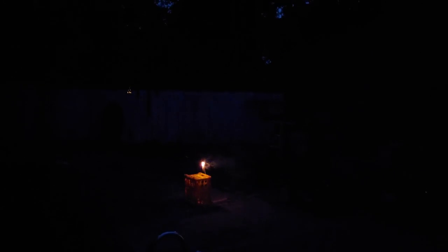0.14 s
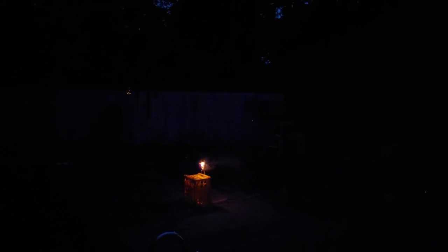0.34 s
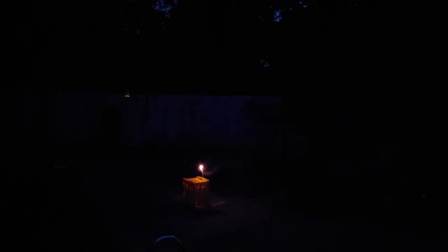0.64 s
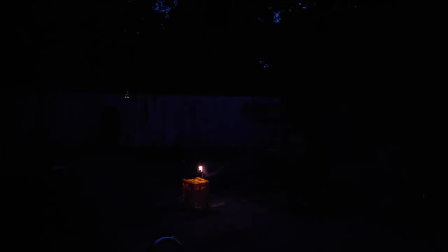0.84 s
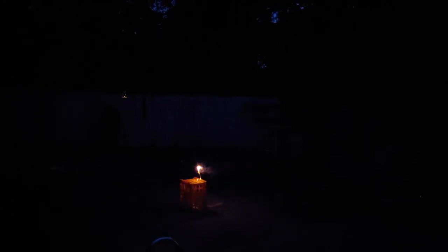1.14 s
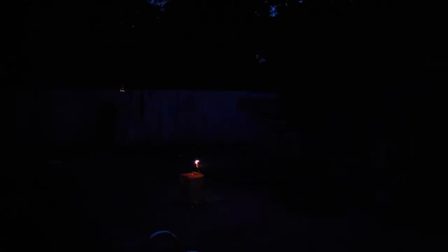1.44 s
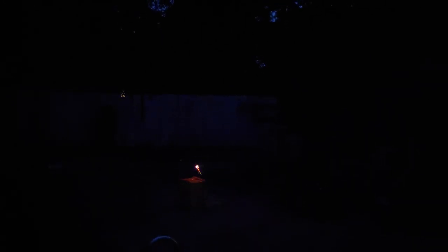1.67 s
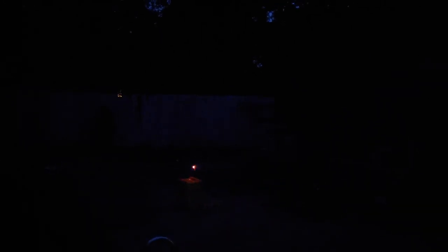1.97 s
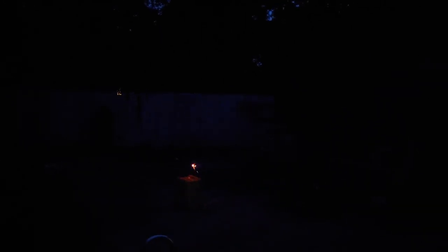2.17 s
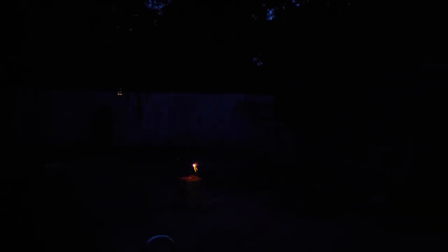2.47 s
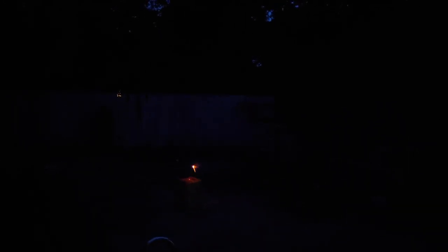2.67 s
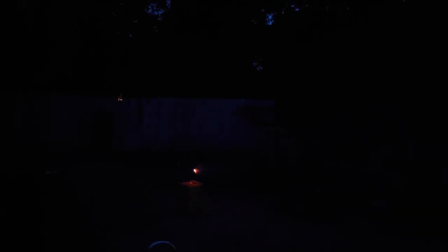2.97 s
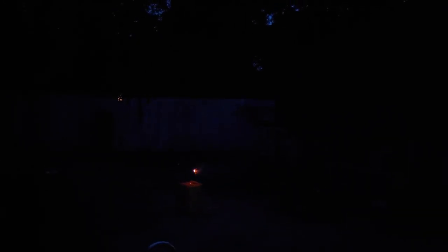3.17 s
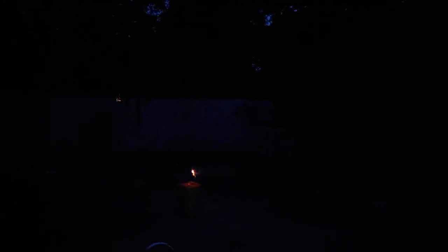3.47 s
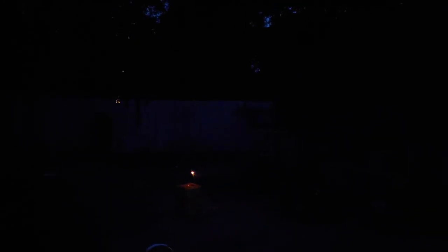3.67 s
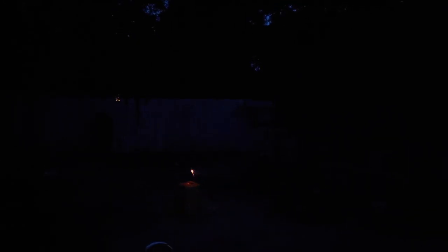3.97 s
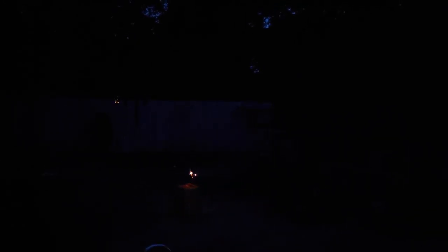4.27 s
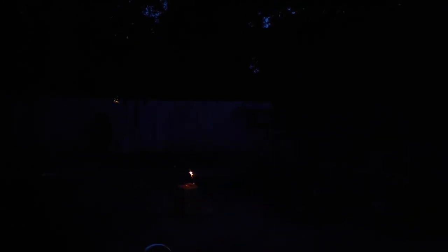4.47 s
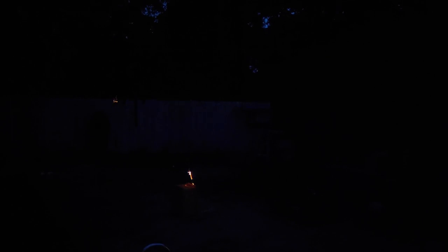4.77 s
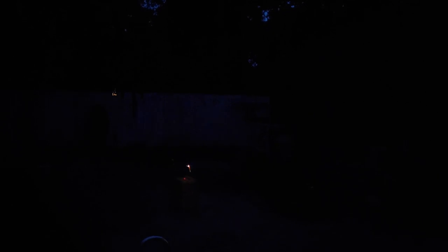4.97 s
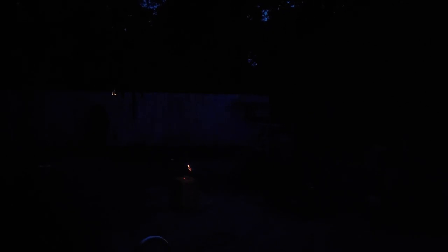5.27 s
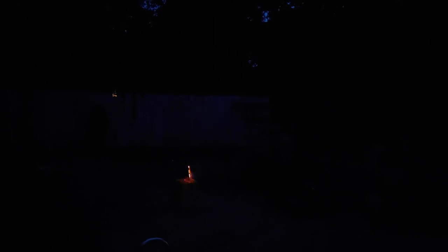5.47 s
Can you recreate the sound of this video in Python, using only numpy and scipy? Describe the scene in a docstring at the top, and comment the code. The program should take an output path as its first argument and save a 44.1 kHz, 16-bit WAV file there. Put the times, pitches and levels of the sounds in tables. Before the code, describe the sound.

Outdoors at night, a few metres from a stereo microphone pair, a homemade rocket motor burns with a dull, fluttering low roar full of tiny pops. Low thumps of gas and rough spark puffs punctuate it irregularly. Past the middle a broad whoosh flares and sinks, the burning stays stronger, and a thin hiss rises at the end.

```python
"""A homemade rocket motor burns at its fuse end in a yard at night, a few metres from a stereo microphone pair.
The flame is coloured noise: a dull, fluttering roar with small pops. A thin hiss of powder carries airy whistles.
Spurts of sparks are puffs of rough noise that rush out and die away; gas pockets are short low pulsations.
One big flare, a broad whoosh with a brief bright jet, comes past the middle; near the end the hiss swells."""
import sys
import numpy as np
from scipy import signal
from scipy.fft import rfft, irfft, next_fast_len
from scipy.io import wavfile

SR = 44100
rng = np.random.default_rng(int(sys.argv[2]) if len(sys.argv) > 2 else 0)


def transcribe(u):
    """Save the signal u as a 16-bit wav file named by the first command-line argument.

    u: samples, shape (n,) or (channels, n), limited to [-1, 1]; the rate is SR.
    q: integer samples, one column per channel.
    """
    v = np.clip(np.atleast_2d(u).T, -1, 1)
    q = np.round(v * 32767).astype(np.int16)
    wavfile.write(sys.argv[1], SR, q)


N = 247842
TIME = np.arange(N) / SR   # s
# In every *_COLOUR table the decibels give only the shape: the noise is later scaled to unit rms.


def from_db(db):
    """Decibels to amplitude gain."""
    return 10 ** (np.asarray(db) / 20)


def rms_one(x):
    """Scale to unit rms."""
    return x / np.sqrt(np.mean(x ** 2) + 1e-20)


def level_over_time(points):
    """Join (time, level) points by straight lines, read at every sample."""
    seconds, level = np.transpose(points)
    return np.interp(TIME, seconds, level)


def at_hz(points, hz):
    """Read a (frequency, value) table on a log-frequency axis."""
    where, value = np.transpose(points)
    return np.interp(np.log(hz), np.log(where), value)


def drift(rate_hz):
    """Slow random wander of unit rms: noise through two equal low-pass poles, made at SR / 40."""
    step = 40   # samples
    pole = np.exp(-2 * np.pi * rate_hz * step / SR)
    settling = 2000   # filter start-up, thrown away
    noise = rng.standard_normal(N // step + settling + 2)
    slow = signal.lfilter([1], [1, -2 * pole, pole * pole], noise)[settling:]
    return np.interp(np.arange(N) / step, np.arange(len(slow)), rms_one(slow))


PORT_LAG_S = 0.00024   # the left microphone is nearer, so the right one hears the motor later


def at_microphones(x):
    """A sound straight from the motor reaches the right microphone a little later."""
    return np.array([x, np.interp(TIME - PORT_LAG_S, TIME, x)])


# power arriving straight from the motor, the rest being scattered by the yard: hz, direct_share (0-1)
DIRECT_SHARE = [(60, 0.91), (130, 1), (290, 0.82), (640, 0.73), (1200, 0.4), (2000, .05), (4000, 0.2),
                (14000, 0.1)]
# which microphone hears more: hz, left_minus_right_db
LEFT_LEAN = [(60, 2), (110, 1), (200, -1), (380, 2), (700, 0.5), (1290, -2), (2380, -1), (4400, -3.0),
             (8120, 3), (15000, 2.5)]


def turbulence(colour):
    """Stereo noise of one colour: a direct part with the lag, and a scattered part unlike at each microphone."""
    size = next_fast_len(N)
    hz = np.maximum(np.fft.rfftfreq(size, 1 / SR), 1)
    white = rfft(rng.standard_normal((3, size)))
    share = np.clip(at_hz(DIRECT_SHARE, hz), 0, 1)
    lag_s = np.array([[0], [PORT_LAG_S]])
    direct = white[0] * np.exp(-2j * np.pi * hz * lag_s)
    scattered = white[1:]
    both = np.sqrt(share) * direct + np.sqrt(1 - share) * scattered
    lean_db = at_hz(LEFT_LEAN, hz) * [[0.5], [-0.5]]
    gain = from_db(at_hz(colour, hz) + lean_db)
    return rms_one(irfft(both * gain, size)[:, :N])


def burst(start_s, rise_s, t60_s):
    """Envelope of a release of gas: a quick rise, then an exponential fall of 60 dB in t60_s."""
    age = np.maximum(TIME - start_s, 0)
    rise = 1 - np.exp(-age / max(rise_s, 1e-4))
    return rise * from_db(-60 * age / max(t60_s, 1e-2))


def pulsation(hz, cycles, order=3):
    """Gas swings as a sine whose unit-height envelope crests after the given number of cycles."""
    turns = np.arange(SR // 8) / SR * hz
    grown = turns / max(cycles, 0.3)
    envelope = grown ** order * np.exp(order * (1 - grown))
    return envelope * np.sin(2 * np.pi * turns)


def sputter(per_s, low_hz, high_hz, spread_db, count=10):
    """Many small pulsations at random moments, sizes, signs and pitches; rms 1."""
    sizes = from_db(spread_db * np.minimum(rng.exponential(1, N), 3)) * rng.choice([-1, 1], N)
    born = sizes * (rng.random(N) < per_s / SR)
    pitch_index = rng.integers(0, count, N)
    pops = np.zeros(N)
    for k, hz in enumerate(np.geomspace(low_hz, high_hz, count)):
        pops += signal.oaconvolve(born * (pitch_index == k), pulsation(hz, 0.78))[:N]
    return rms_one(at_microphones(pops))


# spurts of sparks; each part is trimmed again where it is played:
# start_s, length_s, hollow_cough_db, sharp_spit_db, flame_fanning_db
SPURTS = [(0.077, 0.046, -36.5, -47, -49), (0.567, 0.023, -41, -69, -66.5), (0.750, 0.035, -38.5, -63, -56),
          (0.833, 0.0088, -59, -42, -52.5), (1.269, 0.024, -39, -60, -59), (1.673, 0.02, -46, -60, -63),
          (1.84, 0.032, -43, -64, -62.5), (1.937, 0.018, -52.5, -57, -55.5),
          (2.429, 0.022, -38.5, -46, -49.5), (2.782, 0.0054, -37, -52, -61), (2.827, 0.0091, -42, -42, -53),
          (3.454, 0.04, -56, -52.5, -58.5), (4.165, 0.018, -40.5, -47.5, -63),
          (4.209, 0.016, -31, -44, -50), (4.818, 0.028, -33.5, -46.5, -48), (4.92, 0.056, -46, -51, -53),
          (4.974, 0.024, -31, -44.5, -54.5), (5.575, 0.02, -32.5, -45, -49.5)]
# the big flare: start_s, level_db, rise_s, t60_s
FLARE = (3.620, -27.5, 0.03, 0.64)
FAN_RISE_S, SETTLE_DB_PER_S, FLARE_FANS_DB = 0.012, 25, -47.5


def afterburn():
    """Extra flow through the flame: each spurt and the flare raise it quickly, and each rise sinks slowly."""
    kicks = [(start, fanning_db) for start, *_, fanning_db in SPURTS]
    kicks.append((FLARE[0], FLARE_FANS_DB))
    power = sum((from_db(db) * burst(s, FAN_RISE_S, 60 / SETTLE_DB_PER_S)) ** 2 for s, db in kicks)
    return np.sqrt(power)


# how hard the fuse burns between spurts, before each layer's own gain: time_s, level_db
BURN = [(0.0, -40.5), (0.34, -38.5), (0.44, -37.5), (1.0, -41), (1.33, -43.5), (1.58, -44), (2.08, -41),
        (2.58, -40.5), (3.43, -41.5), (3.55, -37.5), (3.76, -35.5), (4.33, -37), (4.52, -39), (4.76, -39.5),
        (5.09, -35.5), (5.62, -41)]
# noise of the large eddies: hz, shape_db
RUMBLE_COLOUR = [(15, -52.5), (28, -26.5), (48, -6.5), (80, -1.5), (100, -1.5), (128, 2), (180, -3.5),
                 (280, -21), (600, -60)]
# noise of the smaller eddies, also the wake of a chuff: hz, shape_db
ROAR_COLOUR = [(70, -35.5), (160, -8), (240, 2), (330, -2.5), (490, -3), (590, -9), (720, -19.5),
               (1100, -43), (2500, -79.5)]
# noise of the rush while the flow is slow: hz, shape_db
RUSH_COLOUR = [(300, -30.5), (600, -3), (760, 0.5), (950, -2), (1060, -6.5), (1300, -6), (1700, -11),
               (2000, -21.5), (2450, -32.5), (4000, -63)]
# bright noise of a fast flow, also the spit of a spurt: hz, shape_db
SPIT_COLOUR = [(300, -19.5), (700, -1.5), (930, 2.5), (1200, -3), (1550, -7.5), (1900, -9.5), (2200, -20),
               (2600, -34.5), (3500, -40.5), (6000, -68)]


def flame(rumble_gain_db, roar_gain_db, rush_gain_db, fanned_rumble_db, fanned_roar_db,
          sputter_db, flutter_db, bright_at_db):
    """Large eddies rumble, smaller ones roar and rush; all follow the burn, swell when fanned and flutter."""
    burn_db = level_over_time(BURN)
    fanned = afterburn()
    rumble_size = np.hypot(from_db(burn_db + rumble_gain_db), from_db(fanned_rumble_db) * fanned)
    roar_size = np.hypot(from_db(burn_db + roar_gain_db), from_db(fanned_roar_db) * fanned)
    rush_size = np.hypot(from_db(burn_db + rush_gain_db), fanned)
    rumble = rumble_size * turbulence(RUMBLE_COLOUR)
    roar = roar_size * turbulence(ROAR_COLOUR)
    # a faster flow is brighter, so the rush darkens as it dies down
    bright = 1 / (1 + (from_db(bright_at_db) / rush_size) ** 2)
    dark_rush = np.sqrt(1 - bright) * turbulence(RUSH_COLOUR)
    bright_rush = np.sqrt(bright) * turbulence(SPIT_COLOUR)
    rush = rush_size * (dark_rush + bright_rush)
    pops = sputter(per_s=160, low_hz=151.6, high_hz=490, spread_db=2.0)
    pops = roar_size * from_db(sputter_db) * pops
    flutter = from_db(flutter_db * drift(25))
    return (rumble + roar + rush + pops) * flutter


JET_OPENS_S, LOW_WHISTLE_JOINS_S = 5.193, 5.42
JET_GROWTH_S = 0.46   # time to grow from nothing to strength 1


def jet_growth(start_s):
    """The jet's strength rises in a straight line from the given moment."""
    return np.maximum(TIME - start_s, 0) / JET_GROWTH_S


# thin hiss of the burning powder, before each layer's own gain: time_s, level_db
HISS_LEVEL = [(0.05, -82), (0.11, -81.5), (2.28, -78.5), (2.59, -77), (3.74, -78.5), (4.76, -78.5),
              (5.15, -76.5)]
# moments when an airy whistle swells in the hiss: peak_s, level_db, half_width_s (to 1/e)
WHISTLES = [(0.83, -81, 0.071), (1.15, -76, 0.13), (2.0, -80.5, .12), (2.49, -74, 0.14)]
# broad fizz of the jet: hz, shape_db
HISS_COLOUR = [(1800, -25.5), (2650, -5.5), (3200, 1), (3500, 1.5), (3800, -3.5), (5200, 0.5), (5850, -5),
               (6600, 1), (8300, -1), (9500, -5), (11300, 0), (12200, -5.5), (14000, 0.5), (15400, 5.5)]
# upper whistle band: hz, shape_db
HIGH_WHISTLE_COLOUR = [(2500, -38), (3400, -21), (3780, -18.5), (4050, -5.5), (4250, -1), (4600, -0.5),
                       (4850, -12), (6500, -34)]
# lower whistle band: hz, shape_db
LOW_WHISTLE_COLOUR = [(2500, -29), (3100, -4), (3400, 0), (3850, -15), (5000, -46)]


def hiss(gain_db, whistle_share_db, low_share_db, jet_db, jet_whistle_db, jet_low_whistle_db, fizz_db):
    """A narrow jet fizzes with two airy whistles that come and go; all swell near the end, the lower last."""
    level_db = level_over_time(HISS_LEVEL)
    swells = sum(from_db(db) * np.exp(-((TIME - s) / width) ** 2) for s, db, width in WHISTLES)
    whistling = np.hypot(from_db(level_db + whistle_share_db), swells)
    opening = jet_growth(JET_OPENS_S)
    low_opening = jet_growth(LOW_WHISTLE_JOINS_S)
    broad_size = np.hypot(from_db(level_db + gain_db), from_db(jet_db) * opening)
    high_size = np.hypot(whistling, from_db(jet_whistle_db) * opening)
    low_size = np.hypot(from_db(low_share_db) * whistling, from_db(jet_low_whistle_db) * low_opening)
    broad = broad_size * turbulence(HISS_COLOUR)
    high_whistle = high_size * turbulence(HIGH_WHISTLE_COLOUR)
    low_whistle = low_size * turbulence(LOW_WHISTLE_COLOUR)
    fizz = from_db(fizz_db * drift(150))
    return (broad + high_whistle + low_whistle) * fizz


# hollow noise of a spurt's cough: hz, shape_db
COUGH_COLOUR = [(60, -16), (200, -6.5), (330, -2.5), (490, 4.5), (620, -7), (800, -7), (1000, -15),
                (1400, -34.5), (2500, -65)]


def spurts(cough_db, spit_db, trail_db, crest_share, rough_db, trail_t60_s):
    """A spurt is a rough puff, part hollow cough and part sharp spit; the sparks rush on after it."""
    cough, spit, trail = np.zeros((3, N))
    for start, length, hollow_db, sharp_db, fanning_db in SPURTS:
        age = np.maximum(TIME - start, 0) / max(crest_share * length, 1e-3)   # 1 at the crest
        puff = age * np.exp(1 - age)
        cough += from_db(hollow_db + cough_db) * puff
        spit += from_db(sharp_db + spit_db) * puff
        trail += from_db(fanning_db + trail_db) * burst(start, 0.012, trail_t60_s)
    rough = from_db(rough_db * drift(120))
    hollow = cough * turbulence(COUGH_COLOUR)
    sharp = np.hypot(spit, trail) * turbulence(SPIT_COLOUR)
    return rough * (hollow + sharp)


# gas pockets going off, before the common gain: start_s, level_db, pitch_hz
CHUFFS = [(0.284, -26.5, 130), (0.402, -25.5, 125), (0.446, -14.5, 235), (1.003, -19.5, 242),
          (1.017, -18.5, 245), (1.572, -19, 231), (1.977, -15, 238), (2.374, -18.5, 230),
          (2.566, -26.5, 126), (2.999, -29.5, 145), (3.356, -17, 262), (3.374, -16, 93.8),
          (3.413, -24.5, 96.5), (3.619, -12.5, 235), (3.781, -25, 130), (3.867, -21, 137),
          (4.073, -28, 200), (4.208, -18.5, 476), (4.214, -15.5, 257), (4.973, -15.5, 239),
          (5.199, -17, 246), (5.227, -23, 110), (5.575, -21, 305)]
# echoes of the chuffs from ground and walls: delay_s, level_db
ECHOES = [(.012, -15.5), (.026, -15), (.047, -19.5)]


def chuffs(gain_db, cycles, wake_db, wake_t60_s):
    """Each gas pocket gives one low pulsation, its echoes and a short turbulent wake."""
    pulses, wake = np.zeros(N), np.zeros(N)
    for start, level_db, pitch_hz in CHUFFS:
        first = int(start * SR)
        swing = pulsation(pitch_hz, cycles)[:N - first]
        pulses[first:first + len(swing)] += from_db(level_db + gain_db) * swing
        wake += from_db(level_db + wake_db) * burst(start, 0.004, wake_t60_s)
    echoes = sum(from_db(db) * np.interp(TIME - delay, TIME, pulses) for delay, db in ECHOES)
    return at_microphones(pulses + echoes) + wake * turbulence(ROAR_COLOUR)


# broad whoosh of the flare: hz, shape_db
FLARE_COLOUR = [(25, 5), (70, 14.5), (260, 11), (450, -3), (900, -4), (1500, -4.5), (1950, -10),
                (2300, -18.5), (2700, -33.5), (4500, -59.5)]
# bright jet within the flare: hz, shape_db
FLARE_JET_COLOUR = [(1200, -19), (2200, 3), (2700, 0.5), (3400, -2), (4100, -14), (5500, -17), (7000, -15),
                    (12000, -24.5)]


def flare(jet_db, jet_delay_s, jet_width_s):
    """A larger lump of powder catches with a broad whoosh; its jet is brightest a moment later."""
    start, level_db, rise, t60 = FLARE
    whoosh = from_db(level_db) * burst(start, rise, t60) * turbulence(FLARE_COLOUR)
    swell = np.exp(-((TIME - start - jet_delay_s) / jet_width_s) ** 2)
    jet = from_db(jet_db) * swell * turbulence(FLARE_JET_COLOUR)
    return whoosh + jet


def scene():
    """Everything comes from the motor, a few metres ahead of the microphones."""
    return (flame(rumble_gain_db=-2.5, roar_gain_db=-2.5, rush_gain_db=-19, fanned_rumble_db=0,
                  fanned_roar_db=7.5, sputter_db=-6.5, flutter_db=1.5, bright_at_db=-51)
            + hiss(gain_db=8.5, whistle_share_db=-8.5, low_share_db=-2.5, jet_db=-53.5,
                   jet_whistle_db=-58, jet_low_whistle_db=-54.5, fizz_db=1.07)
            + spurts(cough_db=4, spit_db=2, trail_db=-2, crest_share=0.32, rough_db=1.5, trail_t60_s=0.49)
            + chuffs(gain_db=-1.0, cycles=1.164, wake_db=-17, wake_t60_s=0.29)
            + flare(jet_db=-64.5, jet_delay_s=0.064, jet_width_s=0.05))


CUTOFF_HZ = 15700


def record(dry):
    """A steep elliptic low-pass removes the top: 0.1 dB ripple below the cutoff, 80 dB down above."""
    low_pass = signal.ellip(12, 0.1, 80, CUTOFF_HZ, fs=SR, output="sos")
    return signal.sosfilt(low_pass, dry)


dry = scene()
out = record(dry)
transcribe(out)
```